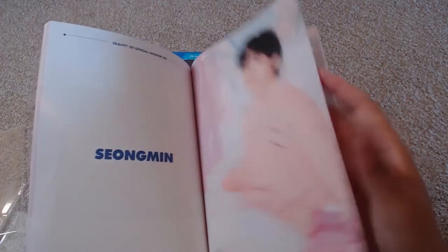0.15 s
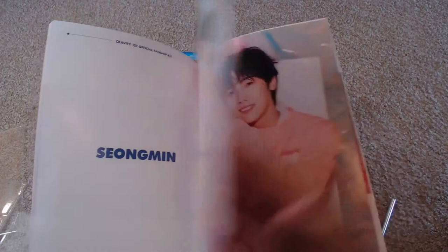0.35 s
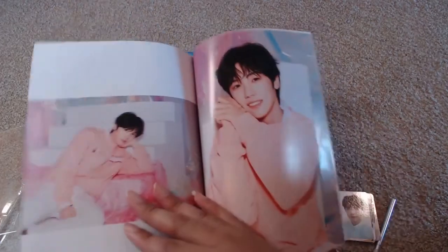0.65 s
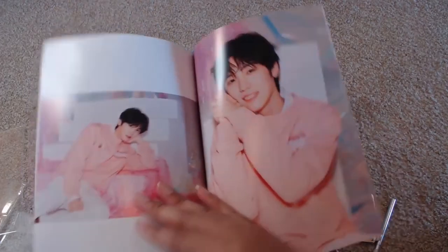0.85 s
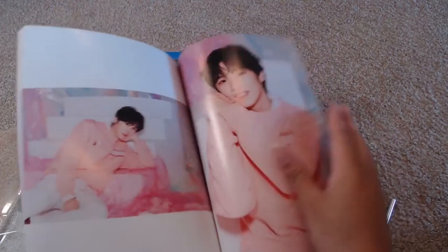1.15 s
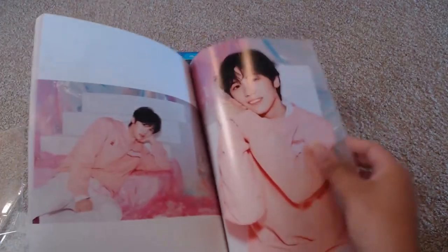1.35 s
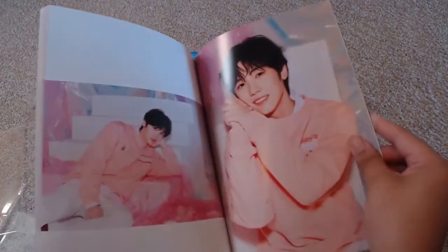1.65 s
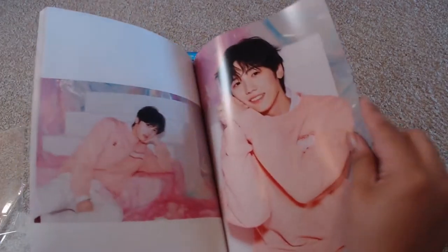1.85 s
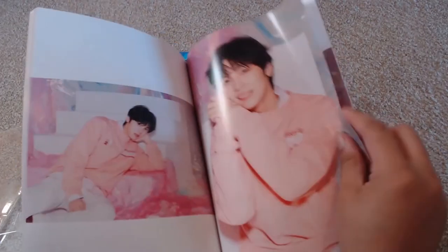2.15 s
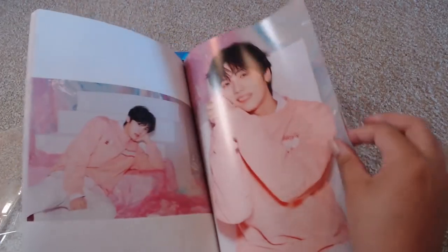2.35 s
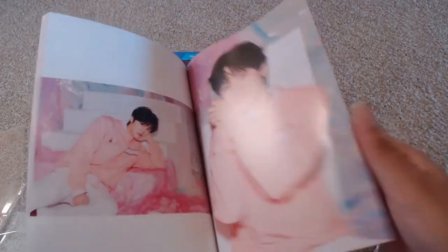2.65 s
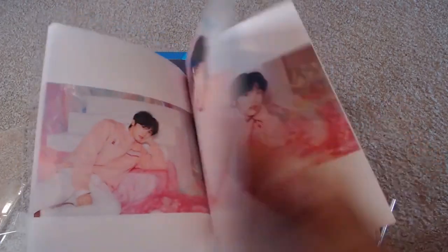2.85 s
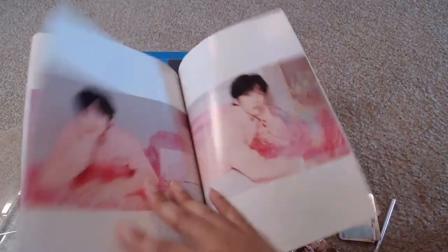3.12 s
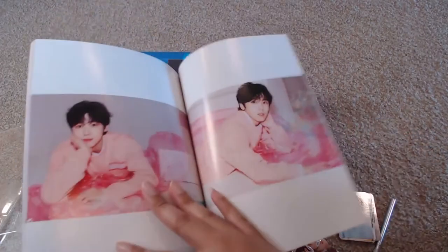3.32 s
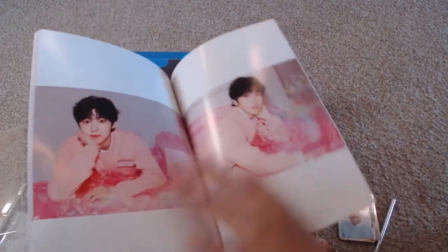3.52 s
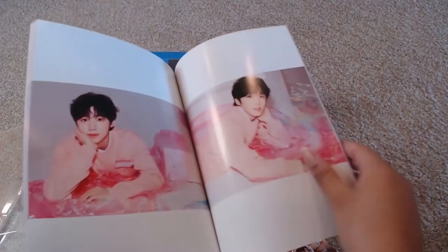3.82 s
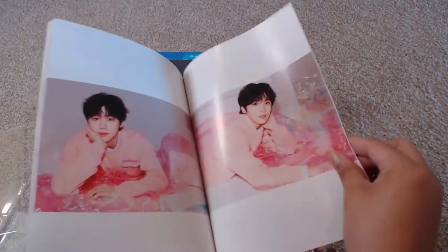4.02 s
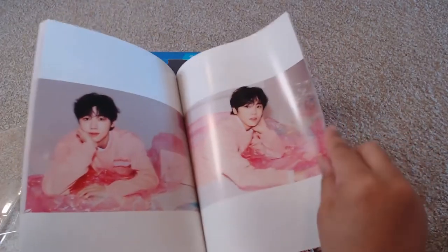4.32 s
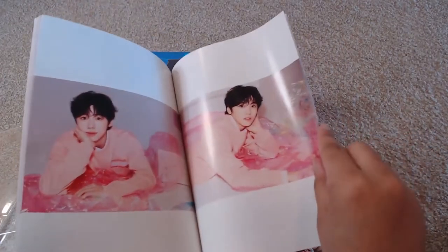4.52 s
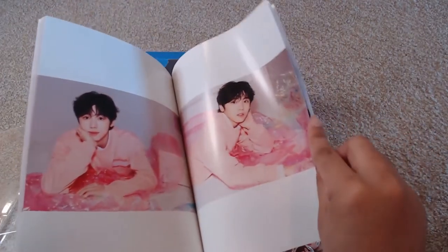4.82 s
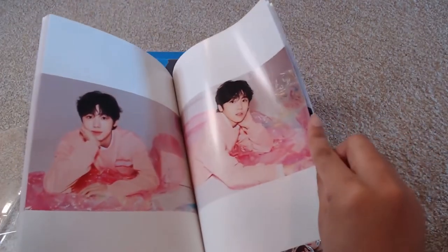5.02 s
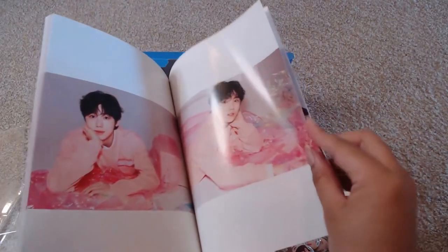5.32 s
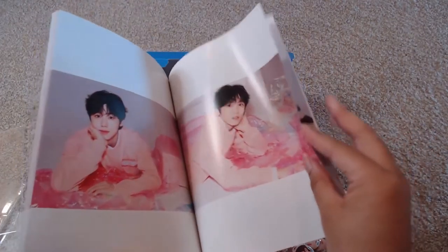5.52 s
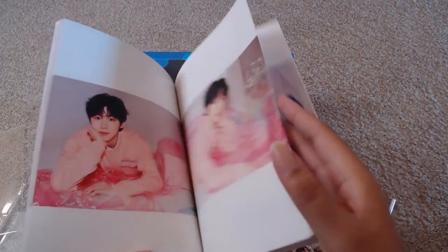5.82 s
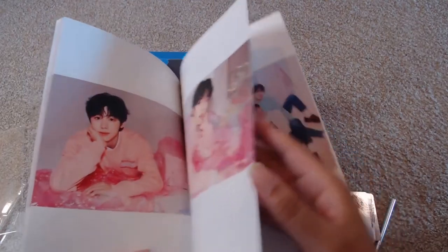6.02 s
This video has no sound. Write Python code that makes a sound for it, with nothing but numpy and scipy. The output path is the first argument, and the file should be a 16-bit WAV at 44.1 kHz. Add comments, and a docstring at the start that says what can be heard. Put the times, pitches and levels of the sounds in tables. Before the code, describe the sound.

A hand leafs through a glossy photo book, close to the microphone in a quiet carpeted room. A page slides over and lands with a snap and soft pats. Fingers rub and flick the next sheet, which crackles and faintly squeaks before it turns. Several sharp edge clicks follow, then a third page is lifted. A low throbbing hum, likely a fan, and light hiss continue underneath.

```python
"""A motor, likely a fan, throbs and hums as a glossy page starts to slide, close by in a quiet room.
A hand is leafing through a photo book on a carpet. Stick-slip friction makes the sheets rustle and
sometimes squeak, and they crackle as they flex. Page edges snap off the thumb, and the hand and the
turned pages pat the damped book block. The walls answer briefly; a faint whine and hiss lie under it all."""
import sys
import numpy as np
from scipy import signal
from scipy.fft import rfft, irfft, next_fast_len
from scipy.io import wavfile
from scipy.ndimage import uniform_filter1d, map_coordinates

SR = 44100
rng = np.random.default_rng(int(sys.argv[2]) if len(sys.argv) > 2 else 0)


def master_out(mix):
    """Clip the mix to full scale and print it as 16-bit PCM to the path in sys.argv[1]."""
    frames = np.transpose(np.atleast_2d(mix))
    ceiling = np.clip(frames, -1, 1)
    pcm = np.round(ceiling * 32767).astype(np.int16)
    wavfile.write(sys.argv[1], SR, pcm)


N = 272097

# Thin whine of the electronics: (frequency [Hz], rms level [dB])
WHINE_TONES = [(2993, -83.5), (5550, -83), (6654, -105), (7208, -90), (12554, -101), (14416, -94)]
# Steady air and microphone hiss: (frequency [Hz], relative spectrum level [dB])
AIR_SPECTRUM = [(10, -3.5), (20, 4.5), (36, 8.5), (46, -0.5), (56, -1), (72, -13), (86, -10.5), (110, -3.5),
                (135, -14), (210, -22), (600, -29), (1500, -40), (5500, -50.5), (16000, -63)]
# Paper sliding on paper or skin as two pages are turned and a third is lifted:
# (start [s], rise [s], fade [s], relative level [dB], bowed middle offset [dB], edge offset [dB])
STROKE_EVENTS = [ (.01, 0.053, 0.13, -47.5, -2.5, -13), (.232, 0.0051, 0.04, -51.5, -8, -11),
                 (.25, 0.039, 0.17, -46, -1.5, -6), (.41, 0.16, 0.045, -46, 0, -4.5),
                 (.7, 0.078, 0.055, -59, -8, -4), (.81, 0.037, .09, -53.5, -2, -11),
                 (.88, 0.055, 0.088, -50.5, -8, -2.5), (.97, 0.049, 0.13, -56.5, 3.5, 0.5),
                 (1.12, .05, 0.22, -62.5, 1, -5), (1.23, 0.064, .08, -53, 1, -4),
                 (1.4, 0.012, 0.19, -58.5, 1.5, -5), (1.5, 0.18, 0.19, -58.5, 5.5, -5),
                 (1.69, 0.16, 0.22, -54.5, -5.5, -6.5), (1.854, 0.059, 0.073, -41, -6, -7),
                 (1.94, 0.063, 0.097, -48.5, 5.5, -19), (2.11, 0.022, 0.062, -35.5, -6.5, -14),
                 (2.15, 0.051, 0.16, -47.5, -1, -8.5), (2.434, 0.035, 0.21, -50, 1, -10.5),
                 (2.56, 0.048, 0.05, -55, 1, -2), (2.67, .05, 0.054, -57.5, 0.5, -11),
                 (2.82, 0.0099, 0.21, -50.5, 1.5, -11.5), (2.96, 0.025, 0.38, -56, -2, -11),
                 (3.09, 0.061, 0.054, -52, -2, -10), (3.265, 0.022, 0.027, -64.5, -1, 5.5),
                 (3.333, 0.021, .17, -60.5, 3, 1), (3.43, 0.064, 0.061, -56, -8, -5),
                 (3.54, 0.021, 0.14, -56.5, -4, -3.5), (3.693, 0.019, 0.04, -55.5, 1, -6),
                 (3.87, 0.1, .14, -64, 6, -1.5), (4.0, 0.17, .09, -55.5, 3.5, -14),
                 (4.19, 0.04, .09, -53, 6, -11), (4.34, 0.058, 0.04, -53.5, -2.5, -15),
                 (4.56, 0.055, 0.17, -63.5, 10, -20), (4.94, 0.031, 0.046, -57, 2, -7),
                 (5.11, .11, 0.18, -58, 0, -10), (5.25, 0.13, 0.18, -54.5, -11, -6),
                 (5.48, 0.092, 0.041, -60, 0, -9), (5.65, 0.073, 0.078, -60, 3, -17),
                 (5.82, 0.054, 0.17, -62, 2, -11), (6.06, 0.068, 0.028, -58, 8.5, -11)]
# Rubbed sheet, flicked edge and patted block, each: (frequency [Hz], relative spectrum level [dB])
RUB_SPECTRUM = [(150, -3), (500, -22.5), (900, -10), (1600, -10.5), (2400, -8), (3500, -1), (5400, 2),
                (6800, -2.5), (9000, -9), (11500, -15.5), (16000, -26.5)]
EDGE_SPECTRUM = [(120, -10.5), (320, 2), (700, -3), (1250, 0), (2000, 0.5), (3600, -3), (5600, 0),
                 (7400, -5), (10000, -7), (16000, -21)]
BLOCK_SPECTRUM = [(60, -24), (150, -2.5), (280, 3), (500, 1), (850, -4), (1250, -12.5), (2000, -24),
                  (4000, -47), (12000, -58)]
# Decay of the carpeted room: (frequency [Hz], reverberation time T60 [s])
ROOM_DECAY = [(200, 0.18), (1500, 0.17), (6000, 0.24), (14000, 0.17)]
# Page edges slipping free or striking the stack:
# (time [s], level [dB], low body of the sheet [dB], crisp top [dB], bow [dB])
SNAP_EVENTS = [(0.0554, -39.5, -4, -20, -1.5), (0.1067, -39.5, -1, -13, -2.5), (0.1266, -46, 7, -7, 4),
               (0.2357, -46, 6, -11, 5), (0.4771, -40, -5, -14, 3), (.562, -30, -2.5, -13.5, -2),
               (0.5668, -44, 8, 0, 0), (0.5756, -45, 4, 3, -4), (1.5844, -46.5, 8, -24, -2),
               (1.927, -39, -12, -8, 10), (1.9922, -37, -10, -8.5, 0), (2.0209, -36.5, -5, -12, 4),
               (2.0959, -41, -12, -15, 6), (2.124, -38, 5, -3, -3), (2.8276, -49, 5, -34, 2),
               (3.1444, -48.5, -6, -17, 5), (3.1713, -44.5, -24, -20, -3), (3.181, -42.5, -15.5, -8.5, 3),
               (3.5563, -45, 0, -12, -2), (4.0751, -47, 2, -28, -1.5), (4.126, -45.5, -1, -21, 2),
               (4.1679, -39, -4, -24, 2), (4.2524, -34.5, 0, -18, 1), (4.4334, -33, 5, -19, 0),
               (4.6471, -30.5, 4, -17.5, -1), (4.9636, -51.5, -13, -12, 2), (4.9742, -46.5, -5, -9, 3),
               (5.3594, -40.5, -2, -14, -2.5), (5.3914, -43.5, -0.5, -15, -1), (5.7176, -48.5, 16, -28, 5),
               (5.9953, -48.5, -1, -20, -1), (6.0601, -46.5, -5, -23, 0), (6.092, -46.5, -2, -13, 3),
               (6.1136, -40, 3.5, -22, 1)]
# Broad resonances; a bowed sheet rings low, a flat one high:
# (frequency [Hz], half width [Hz], peak [dB], change of peak with bow [dB/dB])
SHEET_MODES = [(1780, 700, 0, 1.63), (5430, 450, -1, -3)]
# Soft pats on the book block: (time [s], level [dB], hardness as upward shift [octaves])
PAT_EVENTS = [(.184, -46, 0.17), (0.549, -42, -0.07), (.5735, -33.5, 0.83), (0.582, -40.5, -0.94),
              (0.5878, -39, 0.73), (1.6528, -34, 0.12), (3.116, -42, -1.3), (3.133, -49, -0.38),
              (3.5554, -35.5, -1.92), (3.9454, -35.5, 0.042), (5.9947, -45.5, 0.4)]
# A bowed sheet singing under the rubbing: (centre time [s], length [s], frequency [Hz], level [dB])
SQUEAK_EVENTS = [(1.935, 0.058, 1720, -47), (1.933, 0.049, 2900, -47), (2.026, 0.026, 1590, -49),
                 (2.134, 0.036, 2880, -44), (2.21, 0.044, 2060, -56), (2.6, 0.015, 1780, -49),
                 (2.993, 0.031, 1530, -57), (3.402, 0.028, 3160, -59.5)]

THROB_DB, BEAT_S, BEAT_LOW_AT_S, BEAT_DEPTH, THROB_FLUTTER = -28.5, 3.04, 2.507, 0.56, 0.18
TOUCH_DB, TOUCH_SWING_DB, TOUCH_FLEX_DB, TOUCH_EDGE_DB = -72.5, 2.5, 3.5, -9
FADE_SHAPE = 2.13  # above 1 the hand holds its speed a while before it slows
FLEX_POWER, EDGE_POWER = 0.78, 0.75  # powers of speed; below 1 these parts sound even in a slow stroke
CRACKLE_PER_S, CRACKLE_DB, CRACKLE_SCATTER_DB = 9, -4, -0.5  # levels relative to the flexing
SNAP_T60_S, PAT_T60_S = 0.02, 0.032
BAND_LIMIT_HZ = 16200


def amp(db):
    """Amplitude ratio: a factor of ten for every 20 dB."""
    return 10 ** (np.asarray(db) / 20)


def unit(x):
    """Normalisation to an rms of 1."""
    return x / np.sqrt(np.mean(x ** 2) + 1e-20)


def along(points, hz):
    """Interpolation of (frequency [Hz], value) points on a logarithmic frequency axis."""
    frequencies, values = np.transpose(points)
    return np.interp(np.log(hz + 1), np.log(frequencies), values)


def wobble(rate):
    """Random modulation: a smooth curve through `rate` Gaussian knots a second."""
    knots = rng.standard_normal(int(N * rate / SR) + 4)
    return map_coordinates(knots, [np.arange(N) * rate / SR])


def filtered(x, response):
    """Linear filtering: the spectrum of x is multiplied by a frequency response."""
    size = next_fast_len(N + SR // 2)
    return irfft(rfft(x, size) * response(np.fft.rfftfreq(size, 1 / SR)), size)[:N]


def add(track, start, sound):
    """Superposition: a sound joins the track at `start` seconds."""
    part = track[round(start * SR):][:len(sound)]
    part += sound[:len(part)]


def tone(hz, drift_rad):
    """Phase modulation: a sinusoid of rms 1 wanders slowly about its frequency."""
    t = np.arange(N) / SR
    return np.sqrt(2) * np.sin(2 * np.pi * hz * t + drift_rad * wobble(3.73))


def motor():
    """Beating: the throb of unsteady rotation slowly swells and sinks, alongside the mains hum."""
    t = np.arange(N) / SR
    beat = np.abs(1 - BEAT_DEPTH * np.exp(2j * np.pi * (t - BEAT_LOW_AT_S) / BEAT_S))
    throb = amp(THROB_DB) * (beat + THROB_FLUTTER * wobble(11)) * tone(hz=27.8, drift_rad=0.36)
    hum = amp(-47.0 + 0.84 * wobble(5.4)) * tone(hz=119.2, drift_rad=0.29)
    return throb + hum


def noise_floor():
    """Stationary noise: the line spectrum of the electronics over broadband air and microphone hiss."""
    whine = sum(amp(db) * tone(hz, drift_rad=0.44) for hz, db in WHINE_TONES)
    air = filtered(rng.standard_normal(N), lambda hz: amp(along(AIR_SPECTRUM, hz)))
    return whine + amp(-36.5) * unit(air)


def stroke_speed(start, rise, fade):
    """Velocity envelope: the hand gathers speed, then slows to a tenth of it over the fade."""
    t = np.arange(N) / SR - start
    gather = np.sin(np.pi / 2 * np.clip(t / rise, 0, 1)) ** 2
    return gather * amp(-20 * np.clip((t - rise) / fade, 0, 3) ** FADE_SHAPE)


def rubbing_gains():
    """Incoherent sources add in power: all strokes sum to gains for the face, bowed middle and edge."""
    touch = amp(TOUCH_DB + TOUCH_SWING_DB * wobble(6.7))  # the resting hand is never quite still
    face = touch ** 2
    flex = (touch * amp(TOUCH_FLEX_DB)) ** 2
    edge = (touch * amp(TOUCH_EDGE_DB)) ** 2
    for start, rise, fade, db, flex_db, edge_db in STROKE_EVENTS:
        speed = stroke_speed(start, rise, fade)
        moving = speed > 1e-3
        face[moving] += (amp(db) * speed[moving]) ** 2
        flex[moving] += (amp(db + flex_db) * speed[moving] ** FLEX_POWER) ** 2
        edge[moving] += (amp(db + edge_db) * speed[moving] ** EDGE_POWER) ** 2
    return np.sqrt([face, flex, edge])


def friction(slips_per_s, scatter_db, grit):
    """Stick-slip friction: tiny releases of uneven size mix with the noise of smooth rubbing."""
    slips = (rng.random(N) < slips_per_s / SR) * rng.choice([-1, 1], N)
    sizes = amp(scatter_db * np.minimum(rng.exponential(size=N), 4))
    return unit(rng.standard_normal(N) + grit * unit(slips * sizes))


def bending(x, depth_db):
    """Time-varying resonance: spectral peaks come and go as the sheet changes shape."""
    spectrogram = signal.stft(x, nperseg=512)[2]
    ripple = rng.standard_normal(spectrogram.shape)
    ripple = uniform_filter1d(ripple, size=4, axis=0)  # smooth over frequency
    ripple = uniform_filter1d(ripple, size=12, axis=1)  # and over time
    return signal.istft(spectrogram * amp(depth_db * unit(ripple)), nperseg=512)[1][:N]


def slides():
    """Forced vibration: friction drives the sheet's bowed middle, face and edge; flexing adds crackle."""
    face_gain, flex_gain, edge_gain = rubbing_gains()
    drive = friction(slips_per_s=601, scatter_db=1.5, grit=0.62) * amp(1.06 * wobble(90))
    rub = filtered(bending(drive, depth_db=1.65), lambda hz: amp(along(RUB_SPECTRUM, hz)))
    below = lambda hz, corner_hz: 1 / (1 + (hz / corner_hz) ** 6)
    flex = unit(filtered(rub, lambda hz: below(hz, corner_hz=2510)))
    face = unit(filtered(rub, lambda hz: below(hz, corner_hz=8800) - below(hz, corner_hz=3000)))
    edge = unit(filtered(rub, lambda hz: 1 - below(hz, corner_hz=8370)))
    rustle = face_gain * face + flex_gain * flex + edge_gain * edge
    return amp(-4.5) * rustle + amp(CRACKLE_DB) * flex_gain * crackle()


def impact(colour_db, flutter, t60, size=4096):
    """Impulse response of paper: a push and a decaying shiver, with the energy of 5 ms at rms 1."""
    t = np.arange(size) / SR
    hz = np.fft.rfftfreq(size, 1 / SR)
    shiver = rng.standard_normal(size) * amp(-60 * t / t60)
    highpass = 1j * hz / (450 + 1j * hz)  # long waves take the push as a whole, short ones shiver on
    push = 1 + flutter * rfft(shiver / np.linalg.norm(shiver)) * highpass
    # folding the cepstrum makes the colour a causal, minimum-phase filter
    cepstrum = irfft(np.log(amp(colour_db(hz))))
    cepstrum[1:size // 2] *= 2
    cepstrum[size // 2 + 1:] = 0
    sound = irfft(-push * np.exp(rfft(cepstrum)))
    return sound / np.linalg.norm(sound) * np.sqrt(0.005 * SR)


def crackle():
    """Random impulse train: the flexing sheet gives stray ticks of nearly equal strength."""
    out = np.zeros(N)
    count = round(CRACKLE_PER_S * N / SR)
    for start, size in zip(rng.uniform(0, N / SR, count), rng.standard_normal(count)):
        tick = impact(lambda hz: along(EDGE_SPECTRUM, hz), flutter=1.1, t60=0.0056)
        add(out, start, amp(CRACKLE_SCATTER_DB * min(size, 1)) * tick)
    return out


def room(x, wet_db, gap_s):
    """Reverberation: after a short gap, reflections in the small room die away exponentially."""
    hz, t, noise = signal.stft(rng.standard_normal(SR // 2), SR, nperseg=256)
    decay = amp(-60 * t / along(ROOM_DECAY, hz)[:, None])
    tail = signal.istft(noise * decay, SR, nperseg=256)[1]
    response = np.pad(amp(wet_db) * tail / np.linalg.norm(tail), (int(gap_s * SR), 0))
    return signal.fftconvolve(x, response)[:N]


def snaps():
    """Elastic release: a stiff edge flicks free; the more sheet moves with it, the fuller the click."""
    out = np.zeros(N)
    for start, db, body_db, crisp_db, bow_db in SNAP_EVENTS:
        body = lambda hz: (body_db + 6) * along([(800, 1.0), (4000, 0.082)], hz)
        top = lambda hz: (crisp_db + 10.5) * along([(6000, 0), (10000, 1)], hz)
        ring = lambda hz: sum((peak_db + share * bow_db) / (1 + ((hz - mode_hz) / width_hz) ** 2)
                              for mode_hz, width_hz, peak_db, share in SHEET_MODES)
        colour = lambda hz: along(EDGE_SPECTRUM, hz) + body(hz) + top(hz) + ring(hz)
        flutter = 1.15 * amp(-0.5 * body_db)  # a thin, loose edge shivers more than a taut sheet
        add(out, start, amp(db) * impact(colour, flutter=flutter, t60=SNAP_T60_S))
        # the walls receive sound from all sides of the sheet, so its shiver evens out
        smooth = impact(colour, flutter=0, t60=SNAP_T60_S)
        add(out, start, amp(db) * room(smooth, wet_db=-4.5, gap_s=0.006))
    return out


def pats():
    """Damped impact: fingers and falling pages land on the thick stack; a harder touch sounds higher."""
    out = np.zeros(N)
    for start, db, hardness in PAT_EVENTS:
        colour = lambda hz: along(BLOCK_SPECTRUM, hz / 2 ** hardness)
        add(out, start, amp(db) * impact(colour, flutter=0.89, t60=PAT_T60_S))
        smooth = impact(colour, flutter=0, t60=PAT_T60_S)
        add(out, start, amp(db) * room(smooth, wet_db=-4.0, gap_s=0.007))
    return out


def squeaks():
    """Resonance: rubbing feeds one narrow mode of the sheet for a moment."""
    out, t = np.zeros(N), np.arange(N) / SR
    for centre, length, hz, db in SQUEAK_EVENTS:
        ring = unit(signal.lfilter(*signal.iirpeak(hz, Q=8, fs=SR), rng.standard_normal(N)))
        swell = np.exp(-2 * ((t - centre) / length) ** 2)
        out += amp(db) * ring * swell
    return out


def scene():
    """Superposition: the paper sounds and their reflections add to the background in one channel."""
    background = motor() + noise_floor()
    rubbing = slides() + squeaks()
    reflections = room(rubbing, wet_db=-10.0, gap_s=0.007)
    return (background + rubbing + reflections + snaps() + pats())[None]


def record(dry):
    """Band limiting: an ideal low-pass filter removes the highest treble."""
    return filtered(dry[0], lambda hz: hz < BAND_LIMIT_HZ)[None]


dry = scene()
out = record(dry)
master_out(out)
```